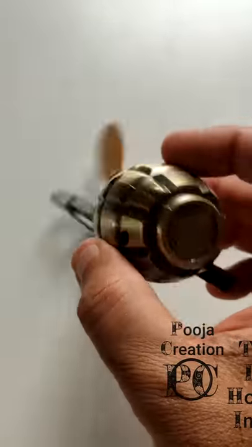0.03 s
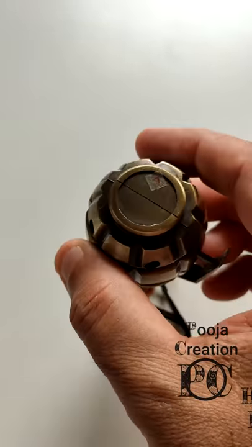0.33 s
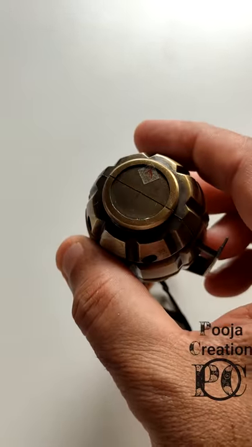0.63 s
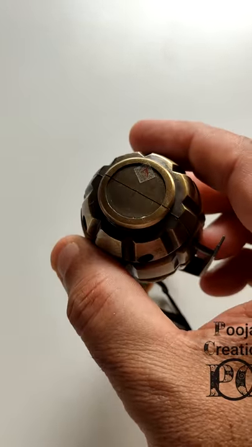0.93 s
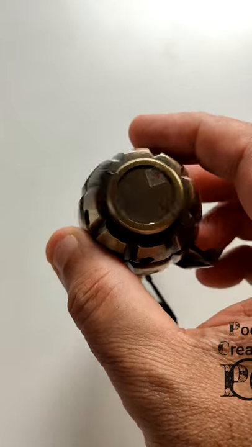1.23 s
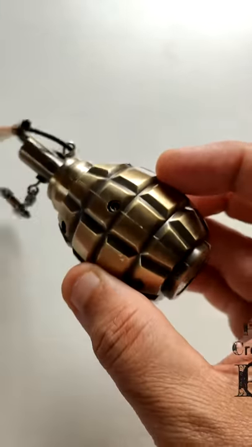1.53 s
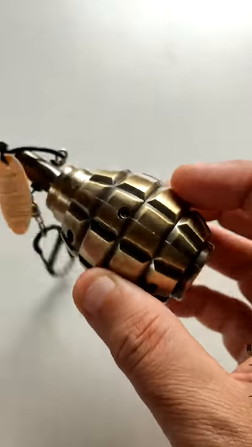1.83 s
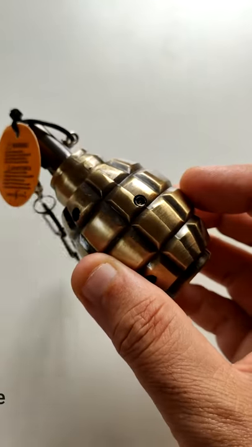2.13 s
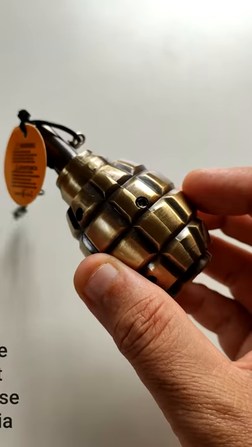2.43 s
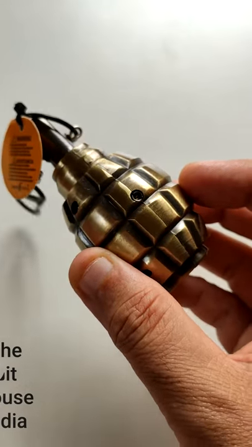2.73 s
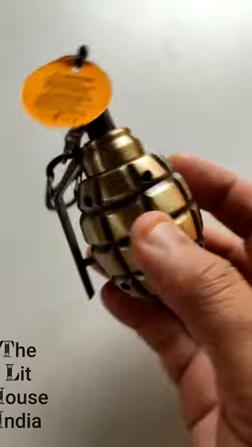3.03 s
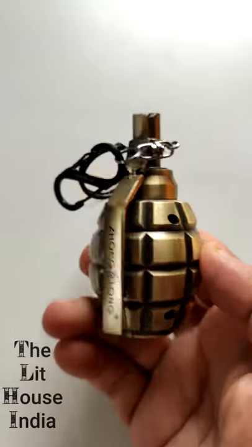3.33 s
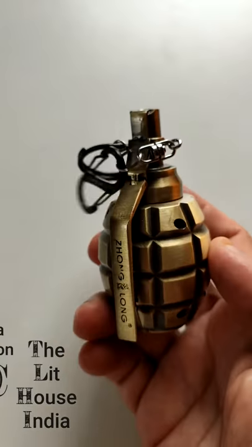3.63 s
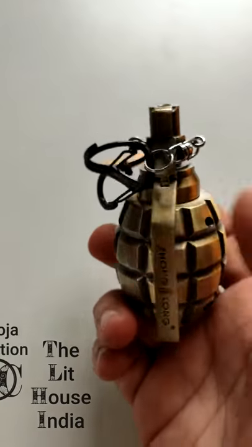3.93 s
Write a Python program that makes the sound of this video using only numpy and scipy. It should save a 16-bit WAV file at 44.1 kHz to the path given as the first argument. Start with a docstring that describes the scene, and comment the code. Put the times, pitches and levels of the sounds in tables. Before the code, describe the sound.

A metal lighter snaps and rattles briefly as it is turned in the hand. Soft rubbing with a faint squeak follows, then its chain and clip clink lightly, close up in a small quiet room.

```python
"""Metal lighter turned in the hand

Close up in a small quiet room, the mechanism snaps and rattles; faint tones linger after each snap.
Skin slides over the ribbed shell, metal squeaks, and chain, clip and tag tick against it.
Each contact is a burst of a few milliseconds coloured by the metal; rubbing is a stream of tiny slips.
Low room noise and a faint sagging tone lie underneath."""
import sys
import numpy as np
from scipy import signal
from scipy.fft import rfft, irfft, next_fast_len
from scipy.io import wavfile
from scipy.ndimage import uniform_filter1d

SR = 44100
rng = np.random.default_rng(int(sys.argv[2]) if len(sys.argv) > 2 else 0)


def unload_wav(signal):
    """Save mono or channel-first audio to the path in sys.argv[1] as 16-bit WAV at rate SR, clipped to [-1, 1]."""
    wavfile.write(
        sys.argv[1],
        SR,
        np.round(np.clip(np.atleast_2d(signal).T, -1, 1) * 32767).astype(np.int16),
    )


N = 176400
BURST_SAMPLES = 8192


def mechanism():
    """Blows within the lighter excite the shell's damped modes; faint narrow tones linger in the tail."""
    # t/s, level/dB, thud/dB, middle/dB, top/dB, length/s, resonance/Hz, lift/dB
    snaps = [(.0887, -32.5, 15.5, 7, 5, .011, 4370, 14.5), (.094, -13.5, -4, 2, 4, 0.0026, 3360, 7),
             (.1073, -19.5, 1.5, -5, 1, 0.002, 4240, 8), (.1086, -19.5, -1, -5, -6, 0.0035, 5300, 9.5),
             (.1424, -27, 5, 2, -4, 0.0032, 4900, 2), (.196, -28.5, 11, 0, 0, 0.0021, 14600, 26),
             (.3535, -39.5, 3, -11, -26, 0.0041, 6340, -6), (.3795, -40.5, 15.5, 11, 21, 0.0041, 8150, 11),
             (.3888, -46.5, 15.5, 17, 5.5, 0.0079, 3800, -7), (.399, -41, 5, 5.5, -18, 0.0074, 11000, -1),
             (.411, -35, 9.5, -1, 3, .0018, 7600, 0.5), (.432, -44, 12.5, 4, -18, 0.0073, 6260, 4),
             (.444, -48.5, 13, 10, -7, 0.0023, 6700, -4), (.455, -46, -13, 6, -22, 0.0095, 1500, 5),
             (1.4285, -55.5, 5, 10, -2, 0.0033, 8200, 2), (1.498, -52.5, 9, 11.5, 1.5, .0006, 4560, 1),
             (1.5112, -46.5, 11, 6.5, -4.5, .0007, 7340, 3.5), (1.523, -57.5, 7, -6, 7, .001, 5940, 0),
             (1.5412, -48, 11, 5.5, -1, 0.0019, 4300, 9.5)]
    # Dense damped modes: f/Hz, level/dB
    shell = [(60, -38), (170, -20), (380, -8.5), (600, -8), (780, -7.5), (1200, -6.5), (1650, -8.5),
             (2200, -6.5), (3200, -12.5), (5000, -2.5), (7300, -2.5), (8300, -11.5), (9500, -16),
             (15500, -30)]
    # Prominent modes: f/Hz, width/Hz, lift/dB
    shell_peaks = [(398.3, 160, 2.5), (1560, 300, 2), (2910, 230, 8), (3620, 850, 5.5), (4210, 610, 3.5),
                   (5480, 320, 3), (6440, 500, 7), (6880, 380, 9.5), (7600, 250, 5), (8400, 330, 3.5),
                   (11110, 550, 8), (12500, 340, 5)]
    # Narrow tones in the reverberant tail: f/Hz, relative level/dB, t60/s
    tail_tones = [(3698, -62, .24), (3785, -60, .22), (4085, -60, .24), (4230, -59, .22), (4775, -62, .24),
                  (5447, -58, .22), (6290, -59, .22), (6600, -60, .2), (6962, -61, .22), (7115, -60, .2),
                  (7860, -59, .2), (9738, -58, .24), (10360, -59, .2), (12100, -57, .2)]
    t = np.arange(2 * BURST_SAMPLES) / SR
    tail = sum(amp(db - 60 * t / t60) * np.cos(2 * np.pi * hz * t) for hz, db, t60 in tail_tones)
    blows = contacts(snaps, shell, shell_peaks, tick=.51)
    return blows + amp(-1) * signal.fftconvolve(blows, tail[None], axes=1)[:, :N]


def chain(link_t60_s=.028):
    """Chain and clip tick on the shell; each touch sets one link ringing."""
    # t/s, level/dB, thud/dB, middle/dB, top/dB, length/s, resonance/Hz, lift/dB, link/Hz, link level/dB
    clinks = [(1.683, -54.5, 1, 9.5, 2, 0.0045, 2800, -2, 6900, -72),
              (3.0249, -40.5, -2.5, -6.5, -5.5, 0.0018, 4800, 5.5, 12300, -48),
              (3.073, -49.5, 7.5, 1, 1, 0.00086, 6520, 2.5, 7900, -64.5),
              (3.108, -52, -5, 3.5, 7.5, 0.0042, 7140, 7.5, 7900, -50.5),
              (3.117, -61.5, 4, 14, -3, 0.0018, 3520, 7, 2320, -67),
              (3.126, -65, -6, 0, 1.5, .002, 7100, 11, 11200, -61),
              (3.238, -57, -6, 4, -4, .002, 2500, 4, 2500, -68),
              (3.2408, -47, -8, 8, 6, .0032, 2685, 7, 10300, -49),
              (3.258, -52, 14, -11, -1, 0.0061, 6070, 9, 9100, -60),
              (3.27, -53, -1.5, -4, 2, .0015, 6200, 5, 8650, -52),
              (3.278, -55, 0.5, -4, 0, 0.0013, 10900, 6, 11050, -57),
              (3.321, -58, 0, 0, 4, 0.0014, 5700, 0, 9950, -61.5),
              (3.339, -63.5, 4, 4, 6, 0.0022, 2980, 7, 10300, -68),
              (3.438, -68.5, 11, 3, -8, .0024, 5020, 1.5, 7200, -75.5),
              (3.6906, -66.5, 1.5, 6, -11.5, 0.0034, 2410, 12.5, 4600, -72),
              (3.7284, -49.5, -10, -0.5, -6, 0.0017, 6930, 0.5, 4470, -50),
              (3.741, -65.5, 3.5, 3, -1.5, 0.0017, 15000, 10.5, 14600, -63.5),
              (3.757, -62, -6.5, 16.5, -6, 0.001, 2710, 6, 2780, -56.5),
              (3.7599, -50.5, -13.5, -1, -1.5, 0.0012, 5800, 7, 4440, -46.5)]
    # Dense damped modes: f/Hz, level/dB
    body = [(100, -44), (400, -14), (1300, -5.5), (2200, 1.5), (3600, -4), (5000, 0.5), (7300, 2),
            (9000, -9.5), (11500, -6.5), (15500, -12)]
    # Prominent modes: f/Hz, width/Hz, lift/dB
    peaks = [(2223, 470, 2.07), (3570, 430, 4.6), (4610, 140, 8.7), (5040, 280, 7.2), (6190, 230, 3.9),
             (6965, 300, 9.6), (11000, 340, 5), (15100, 600, 5)]
    out = contacts(clinks, body, peaks, tick=.67)
    t = np.arange(BURST_SAMPLES) / SR
    for start_s, *_, link_hz, link_db in clinks:
        ping = np.sin(2 * np.pi * (link_hz * t + rng.random((2, 1))))
        add(out, start_s, amp(link_db - 60 * t / link_t60_s) * ping)
    return out


def tag():
    """The hanging tag knocks dryly against the shell."""
    # t/s, level/dB, thud/dB, middle/dB, top/dB, length/s, resonance/Hz, lift/dB
    knocks = [(1.7657, -44, -3, 1.5, -1, 0.0014, 2500, 0)]
    # Tag spectrum: f/Hz, level/dB
    body = [(100, -11), (380, -4), (900, 3.5), (1600, -12), (2000, 6.5), (2750, -1.5), (3400, -20),
            (4000, -0.5), (4450, 3.5), (5500, -11), (6900, 2.5), (9200, -26), (11000, -13), (16000, -28)]
    return contacts(knocks, body, [], tick=.67)


def contacts(rows, body, peaks, tick, level_span_s=.006, resonance_q=5):
    """Each contact excites the resonances of its part, with its own weight and brightness."""
    out = np.zeros((2, N))
    hz = np.fft.rfftfreq(BURST_SAMPLES, 1 / SR)
    metal_db = log_interp(body, hz) + resonance_db(peaks, hz)
    metal_db -= 10 * np.log10(np.mean(amp(metal_db) ** 2))
    for start_s, db, thud_db, middle_db, top_db, length_s, peak_hz, lift_db, *_ in rows:
        colour_db = log_interp([(1110, thud_db), (2900, middle_db), (6560, 0), (11057, top_db)], hz)
        colour_db += resonance_db([(peak_hz, peak_hz / resonance_q, lift_db)], hz)
        spectrum = burst(length_s, tick) * minimum_phase(metal_db + colour_db)
        click = irfft(spectrum)[:, :BURST_SAMPLES // 2] * np.sqrt(level_span_s * SR)
        add(out, start_s, amp(db) * click)
    return out


def burst(length_s, tick, right_tick=.12, tail_db=-13, tail_s=.0067):
    """Flattened stereo spectrum of one contact: a sharp tick plus brief metal-on-metal chatter."""
    # Direct sound: f/Hz, left-right correlation
    correlation = [(500, 0.85), (1500, 0.6), (5000, 0.17), (12000, .2)]
    t = np.arange(BURST_SAMPLES) / SR
    hz = np.fft.rfftfreq(BURST_SAMPLES, 1 / SR)
    envelope = np.exp(-(t / length_s) ** 2) + amp(tail_db) * np.exp(-t / tail_s)
    chatter = rfft(unit_energy(rng.standard_normal((2, BURST_SAMPLES)) * envelope))
    spectrum = stereo(*chatter, log_interp(correlation, hz)) + np.array([[tick], [right_tick]])
    return spectrum / np.sqrt(uniform_filter1d(abs(spectrum) ** 2, size=180, axis=1))


def skin_slide():
    """Skin catches and lets go on the ribbed shell."""
    # Slide envelope: t/s, level/dB
    levels = [(1.05, -91), (1.27, -82.5), (1.36, -60), (1.43, -56), (1.485, -52), (1.505, -58),
              (1.535, -52.5), (1.57, -81), (1.7, -94)]
    # Slide spectrum: f/Hz, level/dB
    surface = [(200, -7), (600, 0), (1500, -2.5), (2500, -2.5), (4200, -5), (5300, -3), (7000, 2.5),
               (8300, -17), (10000, -18), (15500, -27.5)]
    # Resonances: f/Hz, width/Hz, lift/dB
    peaks = [(1480, 300, 6), (3894, 120, 6.4), (4580, 82, 9.8), (6600, 500, 2)]
    return friction(levels, surface, peaks)


def hand_rustle():
    """The moving hand rustles softly."""
    # Rustle envelope: t/s, level/dB
    levels = [(0, -64.5), (.07, -68.5), (.24, -58), (.34, -58), (.45, -54.5), (.5, -79), (.85, -75),
              (1.2, -65.5), (1.42, -56.5), (1.65, -66), (1.95, -72.5), (2.3, -75), (2.53, -70.5),
              (2.75, -84.5), (3.3, -70.5), (3.6, -74.5), (4, -85.5)]
    # Rustle spectrum: f/Hz, level/dB
    surface = [(150, -8), (500, -1), (1200, -5), (2100, -5), (3200, -15), (7000, -16), (9000, -29.5),
               (15000, -34)]
    # Resonances: f/Hz, width/Hz, lift/dB
    peaks = [(847, 400, 4), (1150, 160, 8.5), (1560, 220, 2)]
    return friction(levels, surface, peaks)


def chain_drag():
    """Chain links scrape as they drag."""
    # Drag envelope: t/s, level/dB
    levels = [(3.0, -94.5), (3.15, -77), (3.23, -69), (3.26, -59.5), (3.32, -60.5), (3.38, -75.5),
              (3.5, -87.5), (3.65, -90.5)]
    # Drag spectrum: f/Hz, level/dB
    surface = [(500, -10.5), (1800, -8), (2900, 5), (3800, -3), (7000, -6.5), (9000, -11.5), (11500, -12),
               (15500, -16.5)]
    # Resonances: f/Hz, width/Hz, lift/dB
    peaks = [(800, 200, 6), (2920, 390, 5)]
    return friction(levels, surface, peaks)


def friction(levels, surface, peaks, slips_per_s=2400, catch_hz=70, catch_db=1.8):
    """Tiny slips, clumped by catch and release, coloured by the surface."""
    hz = np.fft.rfftfreq(N, 1 / SR)
    clump_db = catch_db * slow_noise(catch_hz)
    onsets = rng.random(N) < slips_per_s / SR
    scatter_db = np.minimum(rng.exponential(1, N), 4)
    noise = rng.standard_normal(N) + rng.standard_normal((2, N))  # common + per channel
    slips = onsets * amp(clump_db + scatter_db) * noise
    rub = irfft(rfft(slips) * amp(log_interp(surface, hz) + resonance_db(peaks, hz)), N)
    return gain_curve(levels) * np.sqrt(N) * unit_energy(rub)


def squeak(pitch_hz=4540, wander_hz=40):
    """Metal sliding on metal gives a thin wavering whistle."""
    # Squeak envelope: t/s, level/dB
    levels = [(1.08, -120), (1.15, -80), (1.2, -79), (1.33, -77), (1.44, -60.5), (1.49, -57), (1.56, -120)]
    hz = pitch_hz + wander_hz * slow_noise(cutoff_hz=90)
    flutter = slow_noise(cutoff_hz=90)
    return gain_curve(levels) * flutter * np.sin(2 * np.pi * np.cumsum(hz) / SR)


def room(direct, send, rise_s=.014, tail_right_db=-3.5):
    """Direct sound and near reflections, shaded on the right; the send returns as a diffuse tail."""
    # Tail decay: f/Hz, t60/s
    decay = [(250, 1.7), (700, 0.82), (1800, 0.34), (4600, 0.32), (7000, 0.3), (12000, 0.28)]
    # Tail spectrum: f/Hz, level/dB
    colour = [(200, -14), (1000, -16.5), (1700, -7.5), (3000, -10.5), (4800, -9), (6900, -11), (8200, -10),
              (11000, -11.5), (15000, -13.5)]
    # Tail: f/Hz, left-right correlation
    correlation = [(200, 0.8), (550, .85), (1100, .4), (2200, .05)]
    # Near reflections: t/s, level/dB
    echoes = [(.0088, -23), (0.0144, -13), (0.0207, -19.5)]
    # Right channel re left: f/Hz, level/dB
    shading = [(300, -0.5), (1500, -7.5), (3000, -3), (4300, -9), (6700, -11.5), (9500, -3.5),
               (12000, -7.5), (15500, -13)]
    band_hz, frame_s, noise = signal.stft(rng.standard_normal((2, SR)), SR, nperseg=256)
    t60_s = log_interp(decay, band_hz)[:, None]
    _, tail = signal.istft(noise * amp(-60 * frame_s / t60_s) / np.sqrt(t60_s), SR, nperseg=256)
    t = np.arange(tail.shape[1]) / SR
    tail = unit_energy(tail * (1 - np.exp(-(t / rise_s) ** 2)))
    taps = np.zeros((2, SR))
    taps[:, 0] = 1
    for delay_s, db in echoes:
        taps[[0, 1], round(delay_s * SR) + rng.integers(0, 20, 2)] += amp(db)
    size = next_fast_len(N + SR)
    hz = np.fft.rfftfreq(size, 1 / SR)
    near = rfft(taps, size) * amp([0 * hz, log_interp(shading, hz)])
    far = stereo(*rfft(tail, size), log_interp(correlation, hz))
    far *= amp(log_interp(colour, hz)) * amp([[0], [tail_right_db]])
    return irfft(rfft(direct, size) * near + rfft(send, size) * far, size)[:, :N]


def room_noise(level_db=-64.5):
    """Steady low noise, leaning left."""
    # Noise spectrum: f/Hz, relative density/dB
    colour = [(12, -34.5), (20, -6.5), (38, -13), (81, -2.5), (113, -5.5), (234, -1), (337, -7.5),
              (377, -9.5), (410, -12), (607, -17), (759, -10.5), (1120, -16), (1570, -18.5), (2390, -21),
              (4940, -28), (11800, -33.5), (16000, -49)]
    # f/Hz, left-right correlation
    correlation = [(60, 0.88), (180, 0.94), (550, 0.24), (1650, -0.45), (4970, -0.37), (15000, 0.11)]
    # f/Hz, left minus right/dB
    balance = [(60, 2.5), (240, 7), (950, 4), (3770, 1), (15000, -1)]
    hz = np.fft.rfftfreq(N, 1 / SR)
    white = stereo(*rfft(rng.standard_normal((2, N))), log_interp(correlation, hz))
    lean_db = log_interp(balance, hz) / 2
    air = irfft(white * amp(log_interp(colour, hz) + np.array([lean_db, -lean_db])), N)
    return amp(level_db) * air / air.std()


def faint_tone(start_hz=359, wander_hz=3.9, sag_hz_per_s=33):
    """A faint tone swells and sags in pitch as the lighter turns."""
    # Swell: t/s, level before panning/dB
    levels = [(1.3, -89), (1.45, -68.5), (1.6, -65), (1.75, -63), (2.0, -67), (2.2, -90)]
    elapsed_s = np.arange(N) / SR - levels[0][0]
    hz = start_hz - sag_hz_per_s * elapsed_s + wander_hz * slow_noise(cutoff_hz=20)
    pan = amp([[2], [-3]])
    return pan * gain_curve(levels) * np.sin(2 * np.pi * np.cumsum(hz) / SR)


def amp(db):
    """Decibels to gain."""
    return 10 ** (np.asarray(db) / 20)


def unit_energy(x):
    """Scales each channel to energy 1."""
    return x / np.sqrt(np.sum(x ** 2, -1, keepdims=True) + 1e-20)


def slow_noise(cutoff_hz):
    """Low-passed noise, RMS 1."""
    passband = np.fft.rfftfreq(N, 1 / SR) < cutoff_hz
    return np.sqrt(N) * unit_energy(irfft(rfft(rng.standard_normal(N)) * passband, N))


def log_interp(points, hz):
    """Interpolates (f/Hz, value) points over log frequency."""
    point_hz, values = np.transpose(points)
    return np.interp(np.log(hz + 1), np.log(point_hz + 1), values)


def gain_curve(points):
    """Gain per sample from (t/s, level/dB) points."""
    return amp(np.interp(np.arange(N) / SR, *np.transpose(points)))


def resonance_db(peaks, hz):
    """Sum of bell-shaped lifts."""
    return sum(db / (1 + (2 * (hz - peak_hz) / width_hz) ** 2) for peak_hz, width_hz, db in peaks)


def minimum_phase(db):
    """Causal response with the given gain."""
    log_gain = np.log(amp(np.concatenate([db, db[-2:0:-1]])))
    return np.exp(np.conj(signal.hilbert(log_gain)))[:len(db)]


def stereo(a, b, correlation):
    """Two correlated channels from two independent signals."""
    correlation = np.clip(correlation, -1, 1)
    return np.array([a, correlation * a + np.sqrt(1 - correlation ** 2) * b])


def add(mix, start_s, sound):
    """Mixes a sound in place."""
    part = mix[:, round(start_s * SR):][:, :sound.shape[1]]
    part += sound[:, :part.shape[1]]


def scene():
    """Clicks and rubbing in the room, over its background."""
    hanging = chain() + tag()
    rubbing = skin_slide() + hand_rustle() + chain_drag() + squeak()
    held = mechanism() + rubbing
    send = held + amp(-3) * hanging  # chain and tag are closer, so they sound drier
    return room(held + hanging, send) + room_noise() + faint_tone()


def record(dry, low_cut_hz=15, high_cut_hz=16150, ceiling=.7):
    """Cuts the deepest bass, rounds the tallest peaks and limits the band."""
    x = signal.sosfilt(signal.butter(2, low_cut_hz, "high", fs=SR, output="sos"), dry)
    x = x / (1 + (x / ceiling) ** 4) ** .25
    lowpass = signal.firwin(511, high_cut_hz, window=("kaiser", 9), fs=SR)
    return signal.oaconvolve(x, lowpass[None], "same")


dry = scene()
out = record(dry)
unload_wav(out)
```